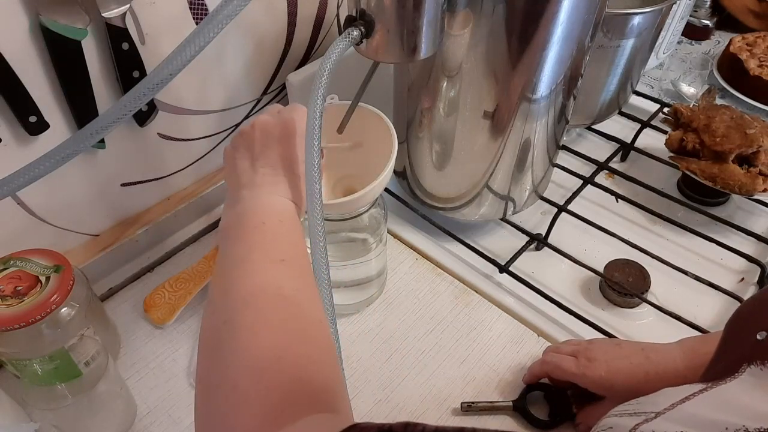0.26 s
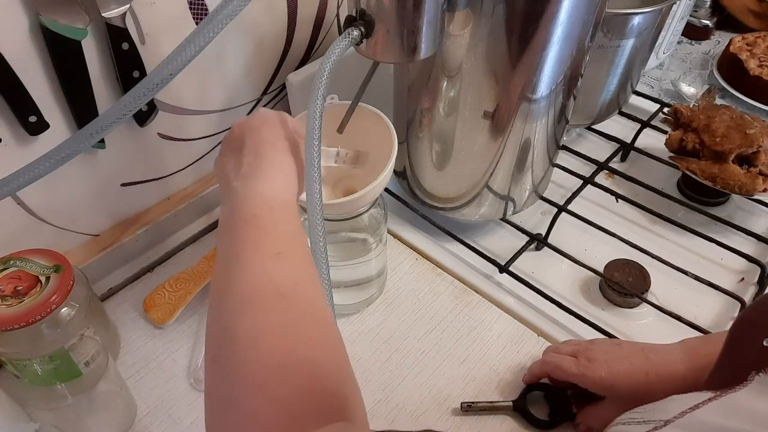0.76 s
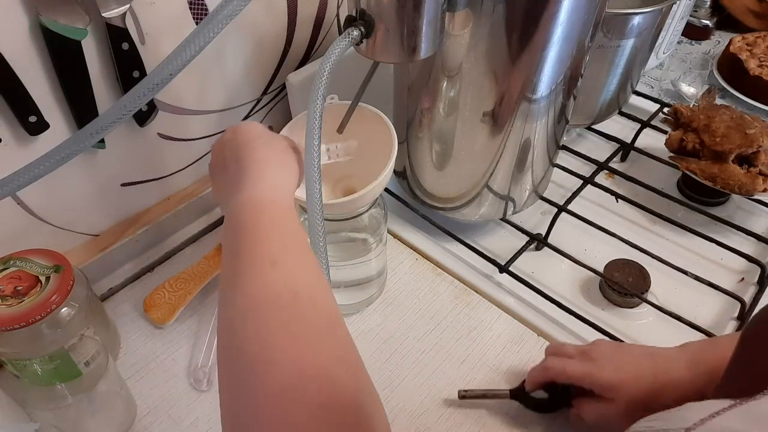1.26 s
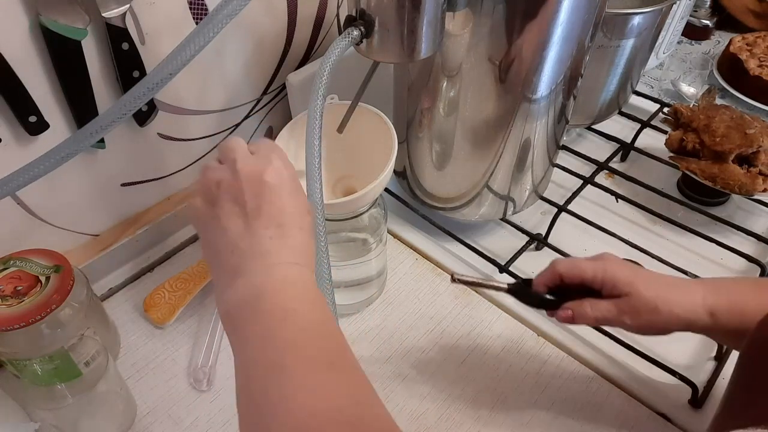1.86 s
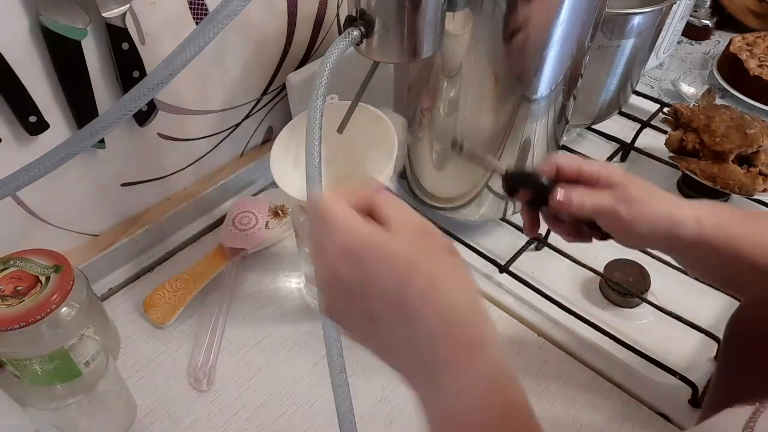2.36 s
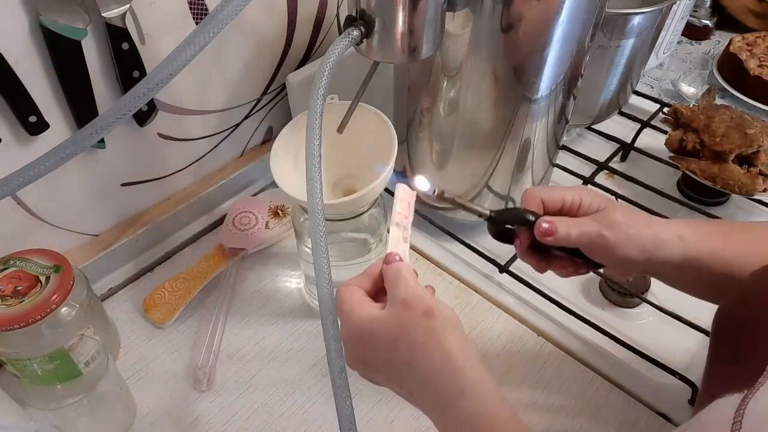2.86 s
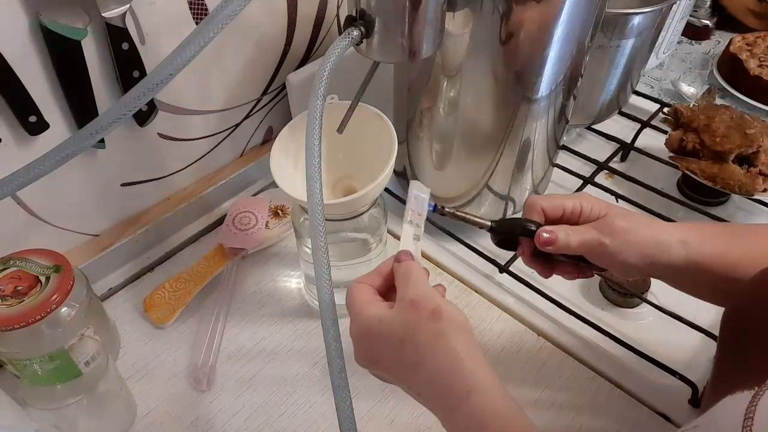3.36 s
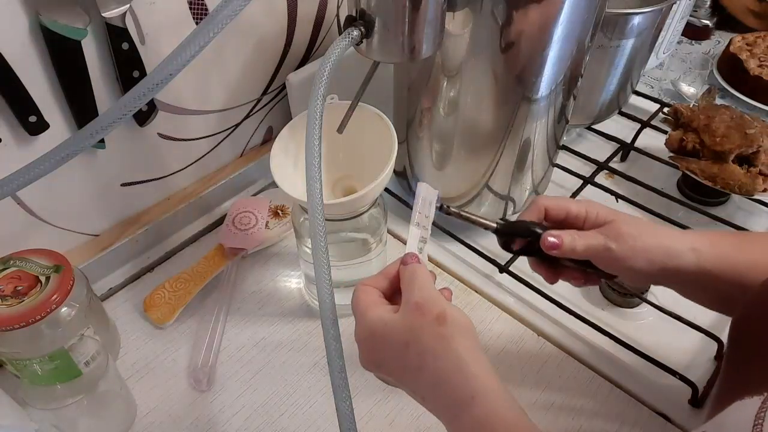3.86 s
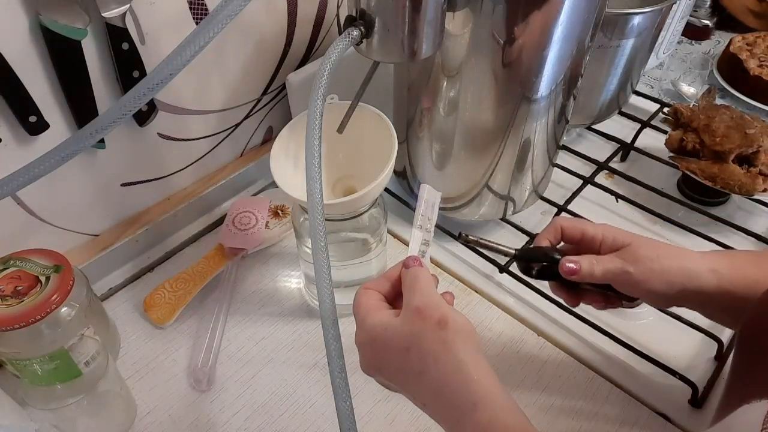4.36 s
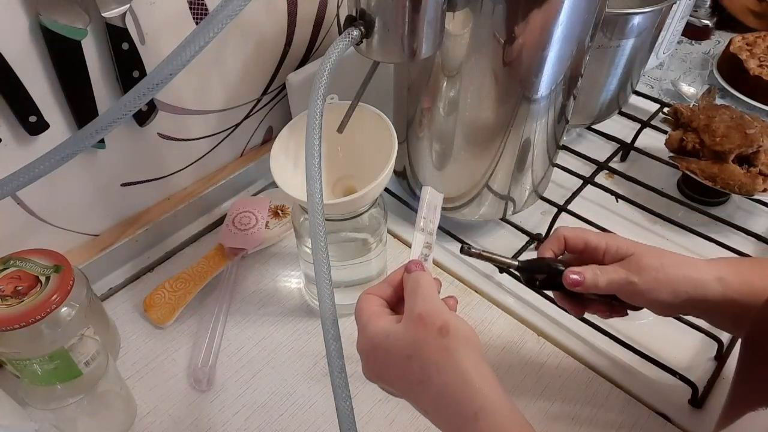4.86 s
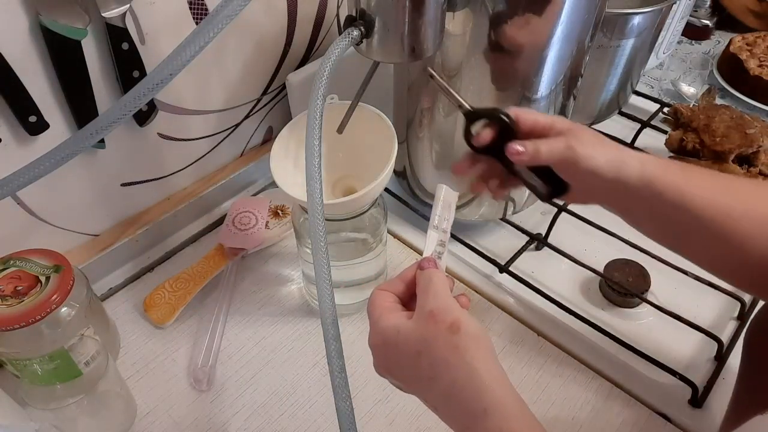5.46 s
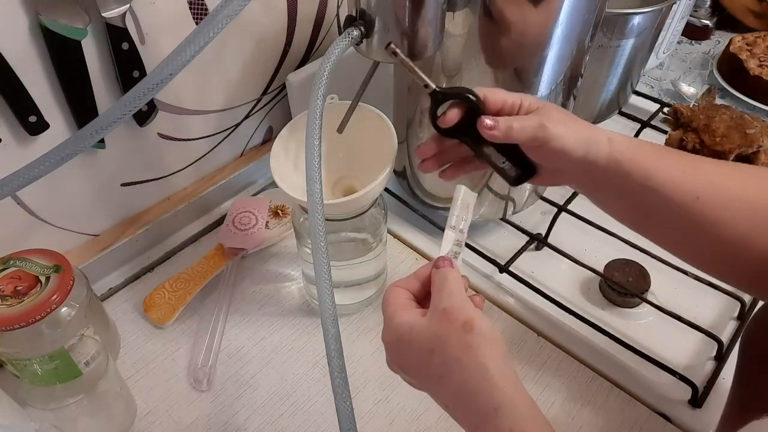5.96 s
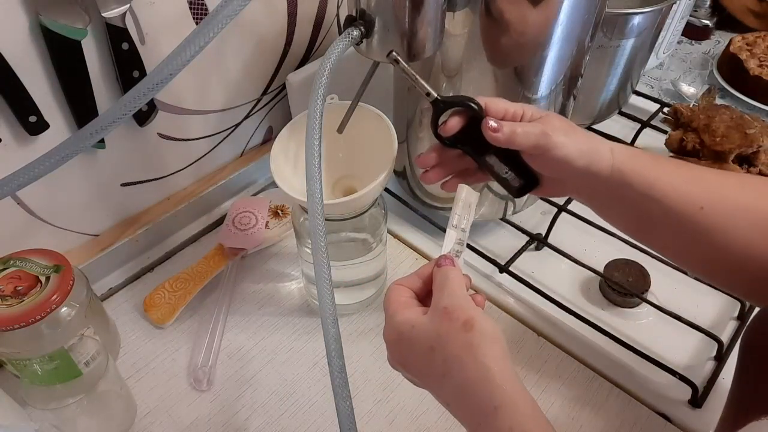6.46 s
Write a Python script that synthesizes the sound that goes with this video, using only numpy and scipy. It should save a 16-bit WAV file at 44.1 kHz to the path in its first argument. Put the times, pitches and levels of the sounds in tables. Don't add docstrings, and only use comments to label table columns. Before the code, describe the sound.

Close stereo phone pickup in a small kitchen. Irregular drops ring inside a steel pot with short hollow pings, mixed with low gurgles, burner hiss and faint fridge hum. Cloth and paper rustle lightly. A lighter is picked up with a plastic clack at about one second, snaps piercingly near three, and releases with a quieter click. The background dips after the snap and slowly returns.

```python
import sys
import numpy as np
from scipy import signal
from scipy.fft import rfft, irfft, next_fast_len
from scipy.io import wavfile
from scipy.ndimage import uniform_filter1d

SR = 44100
rng = np.random.default_rng(int(sys.argv[2]) if len(sys.argv) > 2 else 0)


def elevation(decibels):
    levels = np.asarray(decibels, float)
    return 10 ** (levels / 20)


def transcribe(signal):
    frames = np.atleast_2d(signal).T
    limited = np.clip(frames, -1, 1)
    pcm = np.round(limited * 32767).astype(np.int16)
    wavfile.write(sys.argv[1], SR, pcm)


N = 296340
T = np.arange(N) / SR
SIDES = np.array([[.5], [-.5]])
LOW_MODE_HZ, PITCH_SPREAD_HZ = 1252, 37

# start_s, peak_db, crack_s, tail_db, tail_t60_s, left_minus_right_db
CLICKS = [
    (1.2083, -7, 0.013, -10.5, 0.29, 7),
    (2.888, 2, 0.0057, -13, 0.31, 11),
    (3.7987, -15.5, 0.01, -11, 0.26, 6.5),
]


def on_log(table, hz):
    f, v = np.transpose(table)
    return np.interp(np.log(np.maximum(hz, 1)), np.log(np.maximum(f, 1)), v)


def curve(table):
    s, *columns = np.transpose(table)
    return np.array([np.interp(T, s, c) for c in columns])


def unit(x):
    return x / np.sqrt(np.mean(x ** 2))


def decay(t, t60_s):
    return 1000. ** (-t / t60_s)


def walk(rate_hz):
    hold = int(SR / rate_hz)
    steps = np.repeat(rng.standard_normal(N // hold + 1), hold)
    return unit(uniform_filter1d(uniform_filter1d(steps, hold), hold)[:N])


def mode(x, hz, width_hz):
    return signal.lfilter([1], [1, -np.exp((2j * np.pi * hz - np.pi * width_hz) / SR)], x)


def steep_mode(x, hz, width_hz):
    return mode(mode(x, hz, width_hz), hz, width_hz)


def add(out, start_s, sound):
    i = int(start_s * SR)
    n = min(sound.shape[1], N - i)
    out[:, i:i + n] += sound[:, :n]


def ducking_db():
    duck_db, attack_s, recover_s, kept_down = -12, 0.003, 1.96, 0.07
    since_s = np.maximum(T - CLICKS[1][0], 0)
    back = kept_down + (1 - kept_down) * np.exp(-since_s / recover_s)
    return duck_db * back * (1 - np.exp(-since_s / attack_s))


def activity(hz, simmer_db):
    # hz, boil_share, spray_share
    follows = [(140, 0.82, 0.069), (500, 0.8, 0.042), (3520, .05, 1.83), (8930, 0.41, 1.36)]
    f, boil, spray = np.transpose(follows)
    shares = [np.interp(np.log(hz), np.log(f), share) for share in (boil, spray)]
    return elevation(shares @ simmer_db + ducking_db())


def fridge_hum():
    hum_hz, hum_db, pan_db = 48.55, -32.5, .6
    level = np.sqrt(2) * elevation(hum_db + ducking_db() + pan_db * SIDES)
    return level * np.sin(2 * np.pi * hum_hz * T)


def burner_and_room(simmer_db, floor_db=-36.5, flicker_db=2.0):
    # hz, density_db_per_hz
    colour = [(24, -47), (40, -8), (64, -6), (96, -10.5), (230, -17), (410, -10.5), (1060, -22.5),
              (1260, -22.5), (1400, -21.5), (1750, -32.5), (2360, -27.5), (3190, -35), (7280, -36),
              (13900, -39.5), (15800, -87)]
    # hz, left_right_correlation
    likeness = [(60, 0.63), (130, 1), (290, 0.62), (640, 0.81), (1410, -0.28), (3100, -0.18),
                (6820, -0.041), (15000, -0.11)]
    # hz, left_minus_right_db
    balance = [(60, -1.5), (110, -1.5), (200, -2), (380, 1.5), (700, 0), (1290, 0.5), (2380, 14.5),
               (4400, 6), (8120, 3), (15000, 0)]
    size = next_fast_len(N)
    hz = np.fft.rfftfreq(size, 1 / SR)
    like = np.clip(on_log(likeness, hz), -1, 1)
    mid, side = rfft(rng.standard_normal((2, size))) * np.sqrt([1 + like, 1 - like])
    both = mid + 2 * SIDES * side
    both *= elevation(on_log(colour, np.minimum(hz, 14000)) + on_log(balance, hz) * SIDES)
    both *= elevation(floor_db) / np.std(irfft(both, size))
    out, octave = 0, np.log2(np.maximum(hz, 1) / 30)
    for k in range(10):
        band = irfft(both * np.clip(1 - np.abs(octave - k), 0, 1), size)[:, :N]
        flicker = elevation(flicker_db * (1.5 - k / 12) * walk(12.0))
        out = out + band * activity(30 * 2. ** k, simmer_db) * flicker
    return out


def patter(rate_hz, spread_db, swell_db):
    size = elevation(spread_db * np.minimum(rng.exponential(size=N), 3.5) + swell_db * walk(6.9))
    return (rng.random(N) < rate_hz / SR) * rng.standard_normal(N) * size


def steady_rings(simmer_db):
    # hz, width_hz, rms_db, right_lag_ms, left_minus_right_db
    resonances = [(73.8, 6.7, -48.5, -0.061, 0.5), (133.8, 16.2, -44.5, -0.0054, 2),
                  (200.2, 20, -53, 0.19, 1), (268.3, 10.5, -52.5, -0.09, 0.5),
                  (408, 14.3, -44.5, -0.044, 2.5), (679, 29, -49.5, -0.47, 8), (1264, 79, -41, -0.26, 0.5),
                  (2400, 120, -47.5, -0.27, -2.5), (2043, 53, -67.5, 0.024, 6),
                  (2690, 310, -59, -0.25, -8.5), (3420, 73, -71.5, 0.33, 22),
                  (3050, 1300, -65.5, -0.11, 14), (7440, 700, -63.5, -0.13, 9),
                  (6660, 770, -65, -0.1, -13.5)]
    out, droplets = 0, unit(patter(140, spread_db=4.5, swell_db=2.0))
    for hz, width_hz, db, lag_ms, pan_db in resonances:
        rate_hz = 160 if 1000 < hz < 5000 else 900
        push = unit(patter(rate_hz, spread_db=3.0, swell_db=1.0))
        if 600 < hz < 5000:
            push = push + 0.87 * droplets
        ring = steep_mode(push, hz, 1.01 * width_hz)
        ring = ring * activity(hz, simmer_db) / np.sqrt(np.mean(ring.imag ** 2))
        lag = np.exp(-2j * np.pi * hz * lag_ms / 1000 * (.5 - SIDES))
        out = out + elevation(db + pan_db * SIDES) * (ring * lag).imag
    return out


def strays(count, db, hz, spread_hz, spread_db=6):
    chance, pitch, duck_db = rng.random((count, 2)), rng.standard_normal(count), ducking_db()
    return [(s * T[-1], db + spread_db * (2 * size - 1) + duck_db[int(s * N)] / 2, hz + spread_hz * k)
            for (s, size), k in zip(chance, pitch)]


def low_drops():
    # start_s, peak_db, pitch_hz
    heavy = [(0.2317, -23.5, 1232), (0.2834, -24, 1270), (0.4507, -21.5, 1250), (0.4803, -22.5, 1280),
             (0.8145, -24, 1227), (1.288, -24, 1243), (1.4202, -20.5, 1258), (1.9064, -26, 1262),
             (2.239, -28.5, 1256), (2.306, -26.5, 1270), (2.4852, -25, 1260), (2.597, -24, 1257),
             (2.6245, -29, 1236), (2.7192, -27, 1250), (2.7392, -26.5, 1224), (2.7674, -25, 1270),
             (3.0223, -27, 1245), (3.5722, -25, 1260), (4.013, -32, 1250), (4.565, -30.5, 1295),
             (4.585, -24, 1264), (5.4251, -28.5, 1245), (5.5404, -28, 1258), (5.5705, -31, 1247),
             (6.0218, -29, 1275), (6.1407, -27, 1262), (6.1899, -26.5, 1265), (6.202, -29.5, 1253),
             (6.546, -33, 1267), (6.6733, -28.5, 1250)]
    # start_s, peak_db
    drips = [(0.0597, -25), (0.1517, -27), (0.722, -32), (0.989, -27.5), (1.1512, -27.5), (1.3702, -29),
             (1.7762, -34), (2.057, -31.5), (2.679, -31), (3.239, -37.5), (3.3063, -33), (3.524, -37.5),
             (3.8318, -37), (3.892, -36), (3.942, -38), (4.404, -35), (4.5133, -29.5), (4.674, -35.5),
             (4.7381, -31.5), (5.041, -34.5), (5.4015, -35), (5.5087, -35), (5.8674, -34), (5.974, -35.5),
             (6.0654, -29), (6.119, -33), (6.273, -32), (6.5698, -31), (6.603, -29.5), (6.641, -31)]
    # start_s, peak_db, pitch_hz
    faint = [(0.0424, -32, 1245), (0.665, -34, 1244), (0.7971, -33, 1270), (0.959, -32, 1290),
             (1.6137, -40, 1265), (1.6436, -34.5, 1207), (1.703, -31, 1265), (1.8855, -40, 1272),
             (1.953, -35, 1270), (2.1328, -34, 1282), (2.206, -39, 1260), (2.3765, -39, 1280),
             (2.4306, -38, 1207), (2.5531, -49, 1280), (2.5665, -34.5, 1200), (2.9797, -41, 1225),
             (3.2074, -47.5, 1266), (3.2632, -43, 1290), (3.36, -41, 1260), (3.4388, -40, 1284),
             (3.7529, -44.5, 1230), (3.7808, -41.5, 1280), (3.8576, -41, 1240), (4.111, -37.5, 1270),
             (4.1821, -44, 1256), (4.347, -51, 1260), (4.4538, -50, 1320), (4.4792, -48, 1270),
             (4.4947, -37, 1237), (4.992, -45, 1224), (5.1452, -44, 1240), (5.2175, -35, 1257),
             (5.284, -42, 1270), (5.3507, -53, 1270), (5.3685, -40, 1266), (5.6126, -55, 1290),
             (5.6463, -34.5, 1260), (5.7412, -43, 1250), (5.827, -46, 1320), (5.8396, -35.5, 1250),
             (5.899, -38, 1264), (5.922, -37.5, 1214), (6.1674, -33, 1295), (6.25, -32, 1237),
             (6.3392, -40, 1257), (6.5194, -55, 1320)]
    scatter = rng.standard_normal(len(drips))
    light = [(s, db, LOW_MODE_HZ + PITCH_SPREAD_HZ * k) for (s, db), k in zip(drips, scatter)]
    stray = strays(count=25, db=-45, hz=LOW_MODE_HZ, spread_hz=PITCH_SPREAD_HZ)
    return list(heavy) + light + list(faint) + stray


def wall_notes(table, pan_db, lobe_s, after_db, after_t60, split_hz, partner_db, lag_s, gain_db):
    out, t = np.zeros((2, N)), T[:int(.12 * SR)]
    chance = rng.random((len(table), 6))
    for (s, db, hz), (turn, beat, size, low, high, long) in zip(table, chance):
        late_s = lag_s[int(s * SR)] * (.5 + SIDES)
        length_s = lobe_s * (0.67 + 0.38 * long)
        progress = np.minimum(t / length_s, 1)
        swell = np.sin(np.pi * progress ** 0.61)
        after = elevation(after_db) * progress * decay(t, after_t60) * np.cos(np.pi * split_hz * t + 2 * beat)
        note = np.sin(2 * np.pi * (hz * (t - late_s) + turn))
        for ratio, start in ((.955, low), (1.07, high)):
            partner = np.sin(2 * np.pi * (ratio * hz * (t - late_s) + start))
            note = note + size * elevation(partner_db) * partner
        add(out, max(s - .003, 0), elevation(db + gain_db) * (swell + after) * note)
    return out * elevation(pan_db * SIDES)


def bursts(table, rise_s, shared, pan_db, gain_db):
    out, t = np.zeros((2, N)), T[:int(.14 * SR)]
    for s, db, hz, width_hz, t60 in table:
        noise = rng.standard_normal((3, len(t)))
        noise = shared * noise[0] + (1 - shared) * noise[1:]
        puff = unit(steep_mode(noise, hz, width_hz).imag)
        envelope = np.clip(t / rise_s, 0, 1) * decay(t, max(t60, .01))
        add(out, s - rise_s, elevation(db + gain_db + pan_db * SIDES) * puff * envelope)
    return out


def splashes(table, below_db=-19, above_db=-24, t60=0.16):
    kicks = np.zeros(N)
    for s, db, _ in table:
        kicks[int(s * SR)] += elevation(db)
    puffs = signal.lfilter([1], [1, -decay(1, t60 * SR)], kicks)
    puffs = uniform_filter1d(puffs, size=200)
    out = 0
    for hz, width_hz, db in ((746, 440, below_db), (2400, 2600, above_db)):
        noise = rng.standard_normal((3, N))
        splash = unit(steep_mode(noise[0] + 0.92 * noise[1:], hz, width_hz).imag)
        out = out + elevation(db + 4.9 * SIDES) * splash
    return out * puffs


def pot_drops():
    # time_s, low_left_minus_right_db, high_left_minus_right_db, left_lag_ms
    turning = [(0, -0.5, 7, 0.32), (1.3, 0, 2, 0.28), (2.2, -3.5, 1.5, 0.26), (2.55, 1, 9.5, 0.22),
               (6.72, 3, 6.5, 0.23)]
    # start_s, peak_db, pitch_hz
    pings = [(0.0034, -39.5, 2370), (0.1785, -42, 2400), (0.3406, -32, 2390), (0.4594, -39, 2370),
             (0.5432, -46, 2390), (0.7966, -37.5, 2360), (1.0515, -30.5, 2400), (1.0954, -35.5, 2330),
             (1.4207, -43, 2420), (1.6127, -37.5, 2416), (1.7848, -39.5, 2400), (2.0956, -29.5, 2400),
             (2.2318, -39, 2420), (2.3101, -23, 2330), (2.5162, -31, 2400), (2.6803, -40, 2400),
             (2.7921, -37, 2400), (3.4396, -44, 2400), (3.6371, -37.5, 2400), (3.7239, -41, 2400),
             (4.1155, -43, 2400), (4.4089, -43, 2360), (4.4603, -38, 2410), (5.1477, -40.5, 2400),
             (5.2919, -33.5, 2400), (5.7653, -35.5, 2400), (5.8716, -33.5, 2400), (5.9259, -35.5, 2400),
             (6.4916, -34.5, 2400), (6.6164, -38, 2400)]
    # start_s, peak_db, pitch_hz
    faint_pings = [(0.0463, -48, 2400), (0.0603, -38, 2380), (0.1017, -45, 2390), (0.2349, -48, 2330),
                   (0.3052, -37, 2375), (0.374, -40, 2320), (0.5796, -41, 2400), (0.7138, -43, 2410),
                   (0.9587, -40, 2410), (1.1298, -40, 2480), (1.271, -39, 2340), (1.3294, -35.5, 2400),
                   (1.5484, -56, 2400), (1.6008, -45, 2470), (1.6801, -38, 2380), (1.9081, -45, 2400),
                   (2.5735, -44, 2260), (2.6594, -44, 2400), (2.7731, -48, 2560), (2.8569, -46, 2630),
                   (3.0969, -42, 2400), (3.4037, -42.5, 2380), (3.6227, -50, 2470), (3.7843, -33, 2240),
                   (3.9075, -44, 2400), (4.0133, -46, 2370), (4.4403, -43, 2310), (4.5426, -36.5, 2320),
                   (4.6987, -44, 2400), (4.7721, -40, 2390), (4.8509, -44, 2400), (4.8798, -45, 2400),
                   (4.9811, -38.5, 2400), (5.1312, -51, 2390), (5.4241, -42, 2480), (5.4545, -40, 2400),
                   (5.6471, -50, 2340), (5.9618, -43, 2400), (6.0227, -38, 2400), (6.0781, -44, 2370),
                   (6.124, -39, 2370), (6.2781, -36.5, 2460), (6.3704, -42, 2450), (6.553, -46, 2400),
                   (6.5964, -47, 2260), (6.6448, -40, 2390), (6.6682, -37, 2420)]
    # start_s, peak_db, pitch_hz
    tinks = [(0.0548, -43, 3390), (0.0972, -43, 3400), (0.5137, -38, 3630), (0.8334, -46, 3400),
             (1.3548, -43, 3200), (1.7035, -37, 3000), (1.7888, -44, 3330), (2.3501, -41, 3030),
             (2.5716, -34, 3340), (2.7284, -50, 3320), (5.1487, -47, 3300), (5.8331, -47, 3640),
             (5.896, -44, 3670), (6.0691, -50, 3000), (6.2956, -41, 3450), (6.6737, -40, 3270)]
    # start_s, peak_db, pitch_hz
    gurgles = [(0.056, -27, 623), (0.229, -25, 648), (0.261, -26, 408), (0.372, -21, 612),
               (0.829, -24.5, 266), (1.922, -26, 442), (0.72, -26.5, 596), (1.562, -25, 423),
               (2.073, -25, 413), (2.218, -24, 486), (2.433, -35, 395), (2.487, -25, 398),
               (2.575, -25, 450), (2.687, -28, 506), (2.759, -22.5, 385), (3.955, -31, 414),
               (1.945, -24, 262), (5.293, -25.5, 421), (5.758, -30, 413), (0.27, -27.5, 265)]
    low_pan_db, high_pan_db, lag_ms = curve(turning)
    lag_s = lag_ms / 1000
    low = low_drops()
    pot = wall_notes(low, low_pan_db, lobe_s=0.027, after_db=-4.5, after_t60=0.19, split_hz=25.0,
                     partner_db=-9, lag_s=lag_s, gain_db=2.5)
    pot += wall_notes(pings, high_pan_db, lobe_s=0.024, after_db=2.0, after_t60=0.2, split_hz=32,
                      partner_db=-9.0, lag_s=1.12 * lag_s, gain_db=1.0)
    plinks = list(faint_pings) + strays(count=40, db=-50, hz=2430, spread_hz=0.053 * 2430)
    pot += wall_notes(plinks, high_pan_db, lobe_s=0.026, after_db=-1.5, after_t60=0.06, split_hz=76,
                      partner_db=-4, lag_s=1.24 * lag_s, gain_db=-4.5)
    pot += wall_notes(tinks, high_pan_db, lobe_s=0.037, after_db=0, after_t60=0.089, split_hz=38,
                      partner_db=-1.0, lag_s=0.78 * lag_s, gain_db=-7.5)
    bubbles = [(s, db, hz, 0.15 * hz, .22) for s, db, hz in gurgles]
    pot += bursts(bubbles, rise_s=0.01199, shared=0.73, pan_db=2.5, gain_db=-6.5)
    return pot + splashes(low + list(pings))


def crinkles():
    # hz, width_hz
    resonances = [(3450, 950), (7300, 4000), (11000, 1300), (13800, 2600)]
    # start_s, peak_db, t60_s
    spatters = [(0.5145, -38.5, 0.14), (1.0705, -39, 0.055), (1.0954, -48, 1), (1.7035, -46.5, 0.2),
                (1.8804, -56, 0.21), (2.2484, -43, 0.22), (2.6843, -32.5, 0.043), (3.687, -49, 0.15),
                (3.7384, -50, 0.1), (5.1496, -45, 0.14), (5.896, -48, 0.13), (6.008, -45, 0.097),
                (6.086, -50, 0.2), (6.3674, -46, 0.14), (6.4892, -50, 0.055), (6.6554, -51, .11)]
    # start_s, peak_db, brightest_octaves_above_lowest, t60_s
    rustles = [(.184, -34, 1.33, 0.11), (.339, -42, 1.33, 0.69), (.6644, -38.5, 1.3, 0.15),
               (0.744, -34.5, 1.28, 0.14), (.7894, -45, 1.8, 0.26), (.98, -40, 0.81, 0.12),
               (1.782, -38, 1.5, 0.18), (1.8804, -49, 1.3, 0.54), (2.228, -34.5, 1.3, 0.17),
               (2.2484, -38, 1.1, 0.14), (2.475, -43, 1.1, 0.036), (2.6334, -37, 1.55, 0.073),
               (2.8334, -40.5, 1.4, 0.16), (3.5234, -50.5, 1.5, 0.34), (4.1394, -36, 2.8, .12),
               (4.1894, -42, 2.44, 0.17), (4.6535, -39.5, 1.27, 0.12), (5.0794, -46, 1.9, .13),
               (5.123, -44.5, 1.85, 0.19), (5.207, -54, 1.7, 0.2), (5.382, -41, 2.3, 0.36),
               (5.45, -27, 2.3, 0.077), (5.591, -39, 1.43, 0.1), (5.765, -43, 1.37, 0.3),
               (5.896, -48, 1.9, .16), (6.086, -37.5, 2.24, 0.2), (6.3674, -52, 3, 0.11),
               (6.4892, -53, 2.1, 0.048)]
    spatter_fall_db, rustle_fall_db = 5, 17.5
    rows = [(s, db, 0, t60, spatter_fall_db) for s, db, t60 in spatters]
    rows += [(*row, rustle_fall_db) for row in rustles]
    return [(s, db - fall_db * abs(np.log2(hz / resonances[0][0]) - bright), hz, width_hz, t60)
            for s, db, bright, t60, fall_db in rows for hz, width_hz in resonances]


def hands_and_ticks():
    # start_s, peak_db, hz, width_hz,
    # t60_s
    knocks = [(1.152, -25, 644, 200, 0.03), (1.1553, -20, 700, 350, 0.035),
              (1.152, -27.5, 1510, 1100, 0.052), (1.1565, -31, 3680, 700, 0.033),
              (1.164, -20, 630, 300, 0.032), (1.9151, -27.5, 450, 193, 0.13),
              (2.3101, -40, 2100, 480, 0.069), (2.8845, -33, 3560, 4900, 0.17),
              (3.4871, -29, 1760, 430, 0.021), (4.6901, -32.5, 433, 140, 0.1),
              (1.152, -39, 5000, 5000, 0.05)]
    # start_s, peak_db, hz, width_hz, t60_s
    chirps = [(.186, -38, 7660, 700, .06), (.455, -46, 6800, 900, .08), (.52, -46, 6100, 500, .08),
              (.98, -43, 7760, 500, .08), (1.094, -35, 2970, 500, 0.073), (1.108, -47, 3500, 400, .06),
              (1.18, -47, 7500, 500, .06), (1.42, -49, 7440, 500, .06), (1.882, -44, 9400, 1200, 0.06),
              (3.05, -56, 7500, 150, 0.11), (3.45, -60, 6060, 800, .15), (3.45, -57, 3460, 500, 0.14),
              (3.525, -54, 7540, 600, .08), (3.679, -48, 6880, 300, 0.092), (3.679, -56, 8200, 400, .05),
              (3.738, -44, 4020, 700, .04), (4.457, -39, 2860, 400, 0.053), (4.538, -43, 3050, 500, 0.069),
              (4.542, -39, 1590, 300, .04), (4.58, -30, 760, 200, 0.057), (5.148, -47, 4500, 3000, .04),
              (5.205, -48, 7060, 600, 0.12), (5.378, -44, 7400, 600, .06), (5.765, -47, 7500, 800, .08),
              (6.01, -46, 3470, 250, 0.097), (6.365, -42.5, 3160, 297, .08), (6.47, -52, 7500, 300, .12),
              (6.652, -49, 7200, 700, 0.067)]
    hands = bursts(crinkles(), rise_s=0.0025, shared=0.31, pan_db=2.5, gain_db=-4.5)
    hands += bursts(knocks, rise_s=0.001484, shared=0.37, pan_db=7.0, gain_db=1.0)
    return hands + bursts(chirps, rise_s=0.0049, shared=0.26, pan_db=3.5, gain_db=1.5)


def room(x, tail_hz=9000, t60_s=0.37, gap_s=0.0021):
    t = T[:int(.5 * SR)]
    tail = rng.standard_normal((2, len(t))) * decay(t, t60_s) * np.clip(t / gap_s, 0, 1)
    tail = signal.lfilter(*signal.butter(1, tail_hz, fs=SR), tail)
    tail /= np.sqrt(np.sum(tail ** 2, axis=1, keepdims=True))
    return signal.fftconvolve(x, tail, axes=1)[:, :N]


def lighter(tail_contrast=0.83, tail_top_hz=9500, early_db=-12.0, early_t60=0.092, ring_db=-3.0, ring_t60=0.019):
    # hz, density_db_per_hz
    colours = [
        [(180, -22), (300, -12), (961, -10.5), (1510, -7.5), (2170, -14), (2740, -12.5), (4090, -12.5),
         (4520, -22), (6200, -18.5), (7080, -13), (10400, -19.5), (13100, -16), (16000, -31)],
        [(290, -52), (500, -50), (1110, -17.5), (1950, -14), (2230, -0.5), (2500, 3.5), (3290, -5.5),
         (3980, -4.5), (5090, -12), (5880, -5.5), (8100, -6), (8800, -4), (11000, -10.5), (14000, -4.5),
         (16000, -12)],
        [(410, -39), (700, -8), (1500, -12), (2600, -8), (3460, -10.5), (3990, -4), (5330, -21), (6070, -5.5),
         (6650, -19), (7590, -9), (8880, -17), (11200, -10), (16000, -12.5)],
    ]
    out, t = np.zeros((2, N)), T[:16384]
    hz = np.fft.rfftfreq(len(t), 1 / SR)
    rise = np.clip(t / 0.0009, 0, 1)
    for (s, db, crack_s, tail_db, tail_t60, pan_db), colour in zip(CLICKS, colours):
        noise = rfft(rng.standard_normal((7, len(t))))
        colour_db = on_log(colour, hz)
        crack = unit(irfft((0.52 * noise[0] + noise[1:3]) * elevation(colour_db)))
        crack *= 1000. ** (-(t / (1.08 * crack_s)) ** 1.47)

        peaks = [mid for low, mid, high in zip(colour, colour[1:], colour[2:])
                 if mid[1] > max(low[1], high[1])]
        starts = rng.random((len(peaks), 1)) + 0.096 * rng.random((len(peaks), 2))
        ring = sum(elevation(peak_db) * np.sin(2 * np.pi * (peak_hz * t + turn[:, None]))
                   for (peak_hz, peak_db), turn in zip(peaks, starts))

        early = unit(irfft(noise[3:5] * elevation(0.64 * colour_db))) * elevation(early_db) * decay(t, early_t60)
        early += unit(ring) * elevation(ring_db) * decay(t, ring_t60)
        dulling = np.sqrt(1 + (hz / tail_top_hz) ** 2)
        tail = unit(irfft(noise[5:] * elevation(tail_contrast * colour_db) / dulling))
        tail *= elevation(tail_db) * decay(t, tail_t60)
        add(out, s, elevation(db - 7.5) * rise * ((crack + early) * elevation(pan_db * SIDES) + tail))
    return out


def scene():
    # time_s, boil_db, spray_db
    simmer = [(0, 1.5, -1), (.68, -0.5, -1.5), (.88, -5, -1), (1.6, -0.5, -2), (2.32, 0, -3), (2.71, 2, -2),
              (3.09, 2, -3.5), (3.86, -0.5, -1.5), (4.12, -3.5, -1.5), (4.66, 6, -2), (5.05, 1, -2.5),
              (5.57, -1, -1), (6.1, 0.5, -1), (6.72, 0, -1.5)]
    simmer_db = curve(simmer)
    background = fridge_hum() + burner_and_room(simmer_db) + steady_rings(simmer_db)
    pot = pot_drops()
    hands = hands_and_ticks()
    reverb = room(elevation(-17) * pot + elevation(-5.5) * hands)
    return background + pot + hands + reverb + lighter()


def top_cut(x):
    return signal.sosfilt(signal.butter(12, 16000, fs=SR, output="sos"), x)


def record(dry):
    bottom_hz, top_hz = 45, 15850
    x = np.clip(dry, -1, 1)
    x = signal.sosfilt(signal.butter(2, bottom_hz, "high", fs=SR, output="sos"), x)
    x = signal.sosfilt(signal.ellip(10, .2, 70, top_hz, fs=SR, output="sos"), x)
    return top_cut(np.clip(x, -1, 1))


dry = scene()
out = record(dry)
transcribe(out)
```